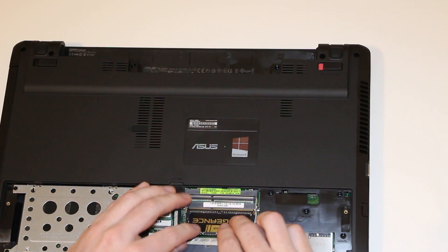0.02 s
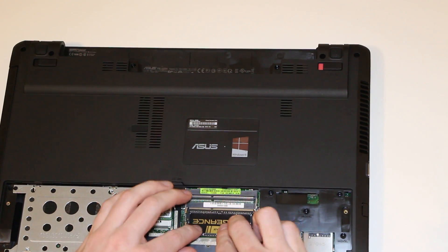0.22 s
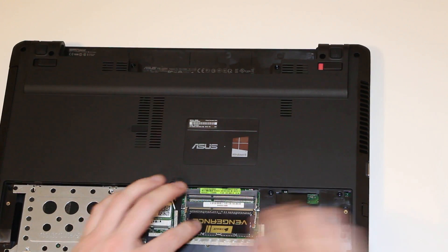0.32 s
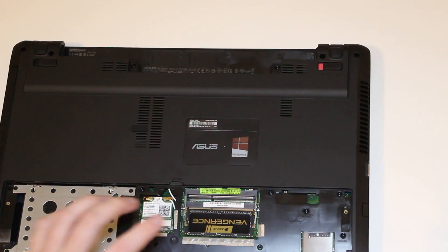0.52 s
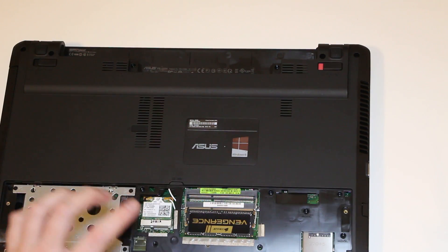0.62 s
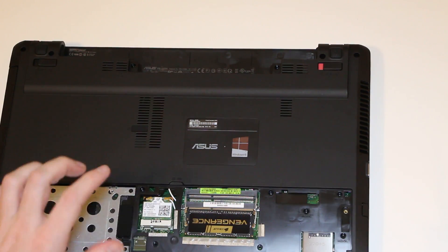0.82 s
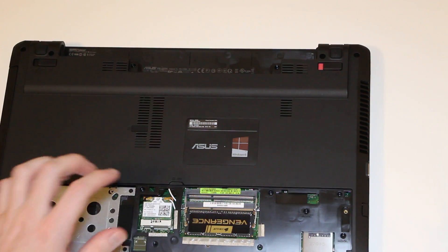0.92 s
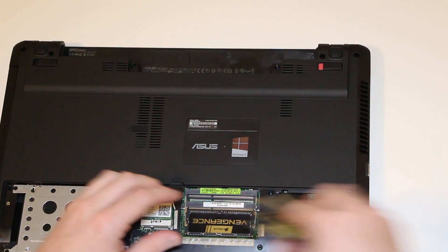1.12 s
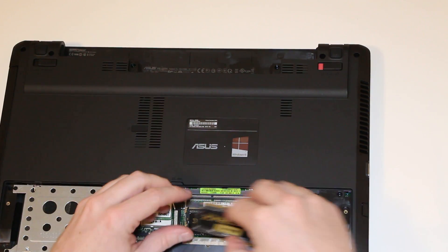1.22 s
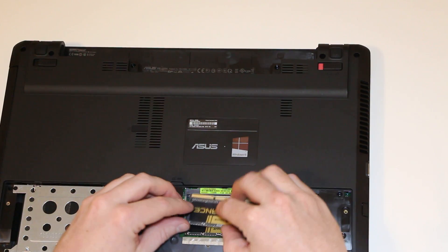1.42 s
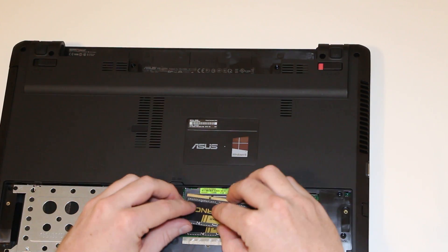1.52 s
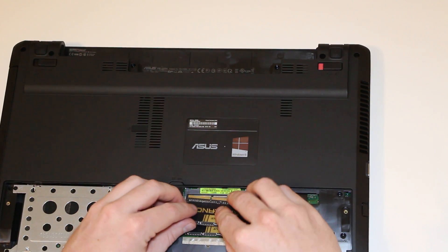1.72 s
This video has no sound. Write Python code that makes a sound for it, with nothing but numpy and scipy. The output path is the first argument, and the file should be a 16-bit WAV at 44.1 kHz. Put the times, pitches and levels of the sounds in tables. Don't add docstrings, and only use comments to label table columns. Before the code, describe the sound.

A memory board snaps hard into spring clips in an opened laptop, then light taps and scrapes

```python
import sys
import numpy as np
from scipy import signal
from scipy.fft import rfft, irfft
from scipy.io import wavfile
from scipy.ndimage import uniform_filter1d

SR = 44100
rng = np.random.default_rng(int(sys.argv[2]) if len(sys.argv) > 2 else 0)


def attenuation_scalar(level_db):
    decades = np.asarray(level_db, float) / 20
    return 10 ** decades


def master_out(mix):
    frames = np.transpose(np.atleast_2d(mix))
    ceiling = np.clip(frames, -1, 1)
    pcm = np.round(ceiling * 32767).astype(np.int16)
    wavfile.write(sys.argv[1], SR, pcm)


N = 79380
T = np.arange(N) / SR


def unit(x):
    return x / np.sqrt(np.mean(x ** 2))


def noise(count=N):
    return rng.standard_normal(count)


def band(x, hz, width_hz):
    return signal.lfilter(*signal.iirpeak(min(hz, .45 * SR), hz / width_hz, fs=SR), x)


def double_band(x, hz, width_hz):
    return band(band(x, hz, width_hz), hz, width_hz)


def shade(x, colour):
    hz, db = np.transpose(colour)
    bins_hz = np.arange(len(x) // 2 + 1) * SR / len(x) + 1
    return irfft(rfft(x) * attenuation_scalar(np.interp(np.log(bins_hz), np.log(hz), db)), len(x))


def walk(rate_hz):
    hold = int(SR / rate_hz)
    steps = np.repeat(noise(N // hold + 1), hold)
    return unit(uniform_filter1d(uniform_filter1d(steps, hold), hold)[:N])


def curve_db(curve):
    time_s, level_db = np.transpose(curve)
    return np.interp(T, time_s, level_db, -120, -120)


# pitch_hz, width_hz, level_db
BODY_MODES = [(518, 250, -7), (806, 110, -18), (960, 150, -5), (1283, 200, -5.5), (1816, 730, 0),
              (2208, 540, -2.5), (2510, 460, -0.5), (3418, 310, -2.5), (3600, 470, 2), (4337, 760, -4),
              (4980, 600, -0.5), (6230, 950, -7.5)]


def strike(contact, gains):
    ring = 0
    for k, (gain, (hz, width_hz, _)) in enumerate(zip(gains, BODY_MODES)):
        ring = ring + (-1) ** k * gain * unit(band(band(contact, hz, width_hz), hz, 2 * width_hz))
    crack = unit(band(band(contact, 12000, 6600), 8600, 12000))
    return ring, crack


def blows(rows, focus_oct, focus_db):
    length = 2048
    out, t = np.zeros((5, N + length)), T[:length]
    click = 1. * (t == 0)
    for n, (start_s, level_db, low_hz, high_hz, crack_db, contact_ms) in enumerate(rows):
        u = t * 1000 / max(contact_ms, .1)
        contact = noise(length) * u * np.exp(-2 * u)
        gains = []
        for hz, _, mode_db in BODY_MODES:
            octaves = min(abs(np.log2(hz / low_hz)), abs(np.log2(hz / high_hz)))
            focus = focus_db * np.exp(-(octaves / focus_oct) ** 2)
            gains.append(attenuation_scalar(mode_db + 1.2 * rng.standard_normal() + focus))
        close, far = strike(contact, gains), strike(click, gains)
        ring_gain = 1 / np.abs(close[0]).max()
        crack_gain = attenuation_scalar(crack_db) / np.abs(close[1]).max()
        i = int(start_s * SR)
        for row, (ring, crack) in ((0, close), (1 + n % 4, far)):
            out[row, i:i + length] += attenuation_scalar(level_db) * (ring_gain * ring + crack_gain * crack)
    return out[:, :N]


def one_pitch(rows):
    return [(s, db, hz, hz, crack_db, ms) for s, db, hz, crack_db, ms in rows]


def rings(rows, send_db=0):
    out = np.zeros((5, N))
    for n, (start_s, peak_db, hz, peak_ms) in enumerate(rows):
        since = T - start_s
        u = np.maximum(since, 0) * 1000 / max(peak_ms, .1)
        detune = 1 + .01 * rng.random()
        out[[0, 1 + n % 4]] += attenuation_scalar(peak_db) * u * np.exp(1 - u) * np.sin(2 * np.pi * hz * since * detune)
    out[1:] *= attenuation_scalar(send_db)
    return out


# start_s, level_db, pitch_hz, crack_db, contact_ms
SNAP_BLOWS = [
    (.2005, -6.5, 4700, -7, 1.4),
    (.2022, -4.5, 2700, -13.5, 0.44),
    (.2038, -3.5, 2300, 4, 0.69),
    (.2052, -6.5, 2200, 3.5, 1.36),
]
# start_s, peak_db, pitch_hz, time_to_peak_ms
SNAP_RINGS = [(.2006, -9.5, 3360, 1.4), (.2008, -13.5, 5900, 0.7), (.2024, -1.5, 2620, 0.95),
              (.2024, -4.5, 3220, 1.2), (.2044, -4.5, 2230, 0.83), (.2034, -11, 1380, 1.7),
              (.2025, -21.5, 532, 2), (.194, -44, 3500, 2.6), (.2025, -15, 990, 2.2),
              (.2036, -13, 4900, 1.2), (.2012, -13, 3900, .9), (.2090, -15, 2000, 1.2),
              (.2120, -18.5, 1290, 2.1), (.2128, -22.5, 3600, 1.2)]


def snap():
    return blows(one_pitch(SNAP_BLOWS), 0.52, 6.6) + rings(SNAP_RINGS, send_db=-8)


# pitch_hz, width_hz, level_db
SPRING_MODES = [(1300, 110, -13), (1464, 49, -13.5), (2086, 60, -8.5), (2534, 80, -14.5),
                (3350, 180, -13.5), (3620, 90, -5.5), (3870, 74, -10)]


def springs():
    kick = 1. * (np.arange(N) == int(SNAP_BLOWS[1][0] * SR))
    out = 0
    for hz, width_hz, level_db in SPRING_MODES:
        out = out + attenuation_scalar(level_db) * band(kick, hz, width_hz) * SR / width_hz / (2 * np.pi)
    return out


# start_s, peak_db, pitch_hz, time_to_peak_ms
SING = [(.207, -30.5, 4290, 32)]


def singing_clip():
    return rings(SING)[0]


def squeak():
    start_s, length_s, pitch_hz, level_db = .142, .013, 7400, -57.5
    return unit(band(noise(), pitch_hz, 320)) * attenuation_scalar(level_db) * np.exp(-((T - start_s) / length_s) ** 2)


# start_s, level_db, pitch_hz, crack_db, contact_ms
TICKS = [(.0557, -26, 2040, -12.5, 1.74), (.6921, -30, 4500, -12.5, 3), (.728, -37.5, 1000, -18.5, 0.55),
         (.7477, -35, 1000, -18.5, 0.87), (.7992, -36, 3600, -18, .6), (.8124, -32, 4000, -19, 0.3),
         (.8167, -31.5, 3500, -25, 0.71), (.856, -40, 4800, -20, 4.2), (1.072, -38, 3800, 5, 0.42),
         (.1975, -30, 3000, -21, 1.5), (1.6636, -44, 1432, -15, 2.5), (1.6866, -38, 2200, -22, .6),
         (1.7214, -39.5, 2300, -25, 1.3)]
# start_s, peak_db, pitch_hz, time_to_peak_ms
TAP_RINGS = [(.727, -40, 1000, 2.5), (.7465, -36, 1000, 1.3), (.7478, -34, 3560, .7),
             (.754, -41.5, 1000, 1.6), (.755, -38, 4310, 1.3), (.772, -43.5, 1000, 1.9),
             (.7985, -28, 2800, .12), (.8167, -30, 2900, .14), (.91, -38, 5000, 2.2),
             (1.0723, -23, 1650, .26), (1.0722, -36, 800, .6), (.8126, -31, 2600, .12),
             (.0558, -38, 870, .45), (.0558, -39, 4510, .15), (1.3665, -46, 2800, .45),
             (1.371, -46.5, 2096, 2.2), (1.37, -49, 1300, 2.06), (1.411, -39, 1580, 1.3),
             (1.4105, -40.5, 3600, 1.6), (1.425, -47, 1880, 2.2), (1.444, -29.5, 2034, 1.65),
             (1.4444, -29, 3600, 1.1), (1.4608, -32, 1897, 1.54), (1.4605, -39, 3730, 0.96),
             (1.475, -46, 2040, 2.2), (1.488, -42.5, 1630, 1.8), (1.496, -50.5, 1880, 2.2),
             (1.508, -46, 1500, 1.9), (1.6868, -37, 3000, 0.75), (1.69, -44.5, 1890, 1.3),
             (1.7018, -27.5, 3380, .9), (1.7018, -28, 4100, .7), (1.7014, -36, 2205, 0.73),
             (1.7014, -40, 1440, 0.89), (1.707, -38.5, 3650, 2.8), (1.722, -39, 1900, .5),
             (1.7225, -37, 3810, 1.8), (1.742, -43, 4100, 2.2)]


def taps():
    return blows(one_pitch(TICKS), focus_oct=.6, focus_db=9) + rings(TAP_RINGS, send_db=-4.5)


# start_s, level_db, low_hz, high_hz, contact_ms
KNOCKS = [(.0064, -40, 1260, 3500, 2.8), (1.072, -42, 571, 6000, .8), (1.411, -43, 1462, 4870, .8),
          (1.4436, -39, 3000, 5730, 2.4), (1.462, -42, 1870, 3600, 2.5), (1.7013, -39, 2630, 4900, 1.3)]


def knocks():
    rows = [(s, db, low_hz, high_hz, -24.5, ms) for s, db, low_hz, high_hz, ms in KNOCKS]
    return blows(rows, focus_oct=.13, focus_db=19.5)


def rub(curve, colour, grain_db, ring_db, patchy_db, treble_law=0):
    size = np.minimum(rng.exponential(size=N), 4)
    grains = noise() * attenuation_scalar(grain_db * size + patchy_db * walk(90))
    ring = sum(band(grains, hz, width_hz / 2) for hz, width_hz, _ in BODY_MODES)
    x = unit(shade(unit(grains) + attenuation_scalar(ring_db) * unit(ring), colour))
    high = signal.sosfiltfilt(signal.butter(2, 6000, "high", fs=SR, output="sos"), x)
    level_db = curve_db(curve)
    treble = attenuation_scalar(treble_law * (level_db - level_db.max()))
    return attenuation_scalar(level_db) * (x + high * (treble - 1))


# time_s, level_db
DRAG = [(.7, -58.5), (.712, -47), (.748, -41.5), (.785, -50), (.815, -46), (.84, -48), (.86, -46),
        (.895, -51.5)]
# pitch_hz, level_db_per_hz
DRAG_COLOUR = [(300, -35), (600, -16), (1000, -4.5), (1600, -7), (2600, -4.5), (3800, -1.5), (5500, -8.5),
               (15500, -24.5)]


def drag():
    return rub(DRAG, DRAG_COLOUR, grain_db=4.2, ring_db=-15.5, patchy_db=3.8, treble_law=1)


# time_s, level_db
FLICK = [(.89, -56), (.9, -40.5), (.914, -36), (.94, -44), (.96, -50.5), (1.02, -71)]
# pitch_hz, level_db_per_hz
FLICK_COLOUR = [(350, -49.5), (600, -39), (1010, -12), (1990, -10), (3710, -1.5), (4260, -8.5), (5010, -11),
                (15500, -33)]


def flick():
    return rub(FLICK, FLICK_COLOUR, grain_db=2, ring_db=-17, patchy_db=1.59, treble_law=0.332)


# time_s, level_db
SEAT = [(0, -49), (.12, -56), (.197, -52.5), (.202, -89.5), (1.1, -77), (1.2, -62), (1.35, -63.5),
        (1.4, -48.5), (1.48, -44.5), (1.56, -63.5), (1.66, -57.5), (1.73, -53.5), (1.8, -65)]
# pitch_hz, level_db_per_hz
SEAT_COLOUR = [(300, 1.5), (800, -8), (1300, -0.5), (1950, -6.5), (2700, -8.5), (3600, -7), (4600, -16.5),
               (9000, -30.5)]


def seat():
    return rub(SEAT, SEAT_COLOUR, grain_db=7.5, ring_db=-10, patchy_db=2.2)


# time_s, level_db
SCUFF = [(.71, -69.5), (.728, -40.5), (.755, -43), (.775, -53), (.8, -75), (1.7, -82), (1.71, -62),
         (1.745, -60), (1.78, -60), (1.8, -61.5)]
# pitch_hz, level_db_per_hz
SCUFF_COLOUR = [(1500, -33), (2800, -13.5), (3500, -4), (4100, -1), (4700, -12.5), (6500, -20),
                (15500, -30)]


def scuff():
    return rub(SCUFF, SCUFF_COLOUR, grain_db=3, ring_db=-37, patchy_db=2.6)


# centre_s, half_length_s, level_db
SWEEPS = [
    (0.75, 0.042, -51.5),
    (0.922, 0.02, -54.5),
    (1.09, 0.02, -56),
    (1.492, 0.0078, -58),
]


def sweeps():
    air = unit(band(band(noise(), 8500, 9000), 8500, 14000))
    return air * sum(attenuation_scalar(db) * np.exp(-((T - s) / half_s) ** 2) for s, half_s, db in SWEEPS)


# time_s, level_db
PALM = [(.7, -88), (.74, -55.5), (.86, -61.5), (.9, -87), (1.12, -77), (1.25, -58), (1.5, -55.5),
        (1.6, -60.5), (1.8, -58.5)]


def palm():
    rustle = unit(band(band(noise(), 310, 274), 339.6, 410))
    return rustle * attenuation_scalar(curve_db(PALM) + 2.17 * walk(29))


# start_s, pitch_hz, time_to_peak_s, peak_db
BOOMS = [(0.2, 114.4, 0.016, -27.5), (.201, 190, 0.044, -42.5), (0.2, 270, 0.0057, -34.5),
         (.201, 61.4, 0.077, -34.5), (.22, 84.8, 0.055, -32.5), (.26, 125.2, 0.08, -35),
         (0.684, 65, .022, -39.5), (0.718, 149.5, 0.034, -50), (.72, 372.6, 0.013, -48),
         (.8, 80, 0.044, -47.5), (1.4, 120, 0.057, -59.5), (1.479, 74, 0.048, -49),
         (1.695, 78.2, 0.03, -45.5)]


def desk():
    out = np.zeros(N)
    for start_s, hz, peak_s, peak_db in BOOMS:
        u = np.maximum(T - start_s, 0) / peak_s
        swell = (u * np.exp(1 - u)) ** 2 * attenuation_scalar(peak_db + 2.35 * walk(12))
        out += swell * np.sin(2 * np.pi * (hz * T + rng.random()) + 0.36 * walk(7.4))
    return out


# pitch_hz, t60_s, level_db
ROOM_DECAY = [(257, .6, -7), (500, .5, -11.5), (1000, 0.49, -11.5), (2020, 0.48, -16), (3930, 0.46, -17),
              (6000, .4, -14), (9040, 0.57, -26), (14000, 0.16, -17.5)]


def room(x):
    desk_echo_s, wall_s, early_db = 0.0014, .021, -6
    t = T[:SR]
    gate = np.where(t < desk_echo_s, 0, attenuation_scalar(np.interp(t, [wall_s - .004, wall_s], [early_db, 0])))
    pitches_hz, t60s, levels_db = np.transpose(ROOM_DECAY)
    tail = 0
    for hz in 180 * 2 ** np.arange(0, 6.6, .5):
        t60_s = np.interp(np.log(hz), np.log(pitches_hz), t60s)
        level_db = np.interp(np.log(hz), np.log(pitches_hz), levels_db)
        tail = tail + double_band(noise(SR), hz, hz / 2.4) * attenuation_scalar(level_db - 19 - 66 * t / t60_s)
    return signal.fftconvolve(x, tail * gate)[:N]


# pitch_hz, level_db_per_hz
FLOOR_COLOUR = [(20, -0.5), (70, 0.5), (140, 2), (300, -13), (690, -20.5), (1300, -22.5), (2800, -26.5),
                (15600, -32.5)]
# time_s, rumble_change_db
LEAN = [(0, 0.5), (.2, 4.5), (.55, 3), (.66, 2), (.8, 10.5), (.9, 0), (1.1, -2), (1.3, -4.5), (1.5, 4),
        (1.62, -4.5), (1.8, -5.5)]


def floor():
    x = unit(shade(noise(), FLOOR_COLOUR))
    low = signal.sosfiltfilt(signal.butter(2, 220, fs=SR, output="sos"), x)
    return attenuation_scalar(-50.5) * (x + low * (attenuation_scalar(curve_db(LEAN)) - 1))


# pitch_hz, level_db_per_hz
SIDE_COLOUR = [(30, -4.5), (200, -4.5), (1000, -9.5), (4000, -10.5), (15000, -10.5)]


def side_hiss():
    return attenuation_scalar(-68) * unit(shade(noise(), SIDE_COLOUR))


def scene():
    hits = snap() + taps() + knocks()
    rubs = drag() + flick() + seat() + scuff()
    ringing = springs()
    close = hits[0] + singing_clip() + attenuation_scalar(-16.5) * ringing + squeak() + rubs + sweeps()
    wet = sum(room(x) for x in hits[1:]) + attenuation_scalar(-6) * room(rubs) + room(ringing)
    mid = close + wet + palm() + desk() + floor()
    side = side_hiss() + attenuation_scalar(-57.5) * room(hits[0])
    return np.array([mid + side, mid - side])


def low_pass(x):
    return signal.sosfilt(signal.butter(12, 15770, fs=SR, output="sos"), x)


def record(dry):
    overload, clip, duck_db, recover_s, top_hz = 0.73, .92, 3.5, 0.14, 15900
    last_overload = np.flatnonzero(np.abs(dry[0]) > overload)[-1]
    since = T - T[last_overload]
    turn_down = np.clip(since / .002, 0, 1)
    gain = attenuation_scalar(-duck_db * np.clip(1 - since / recover_s, 0, 1) * turn_down)
    lowpass = signal.ellip(8, .2, 70, top_hz, fs=SR, output="sos")
    mix = signal.sosfilt(lowpass, np.clip(dry, -clip, clip) * gain)
    return low_pass(mix)


dry = scene()
out = record(dry)
master_out(out)
```